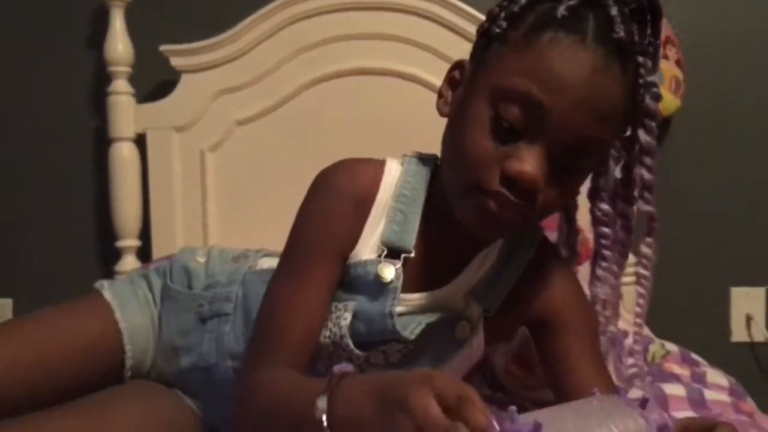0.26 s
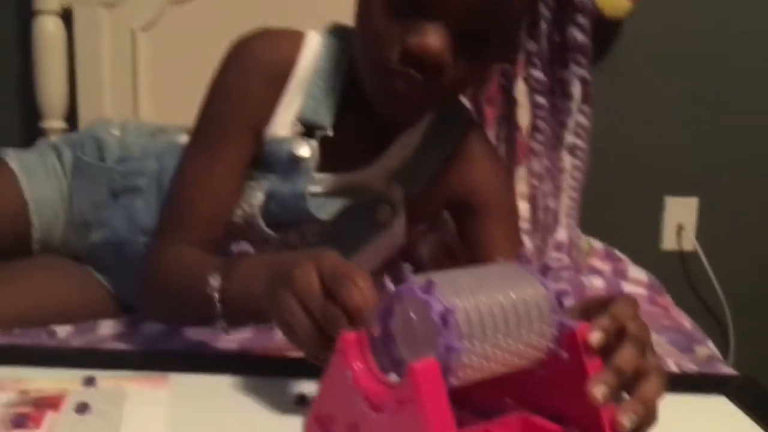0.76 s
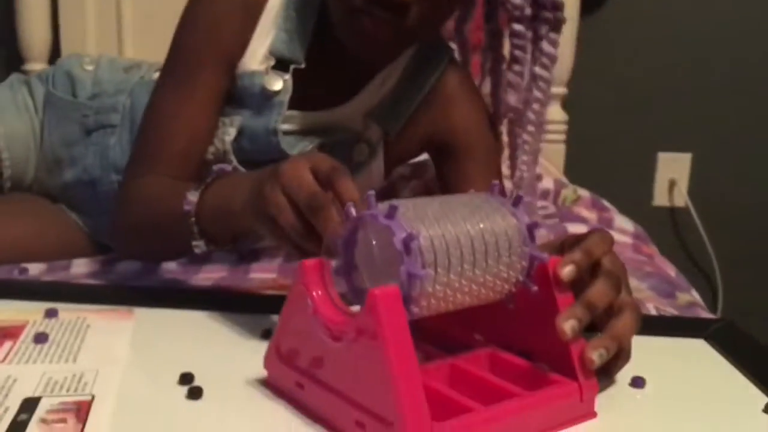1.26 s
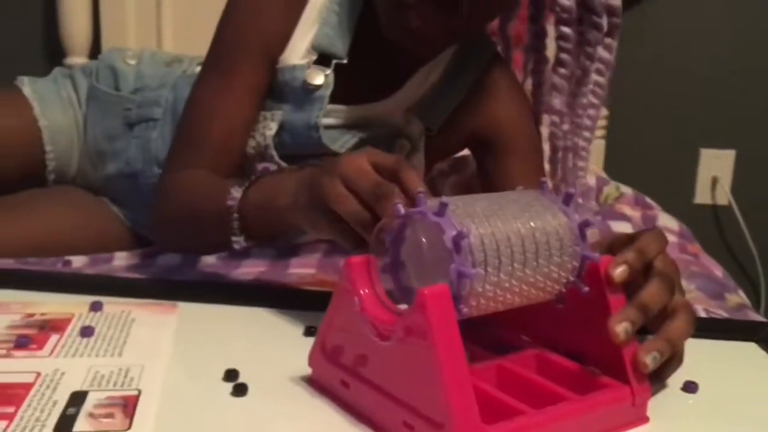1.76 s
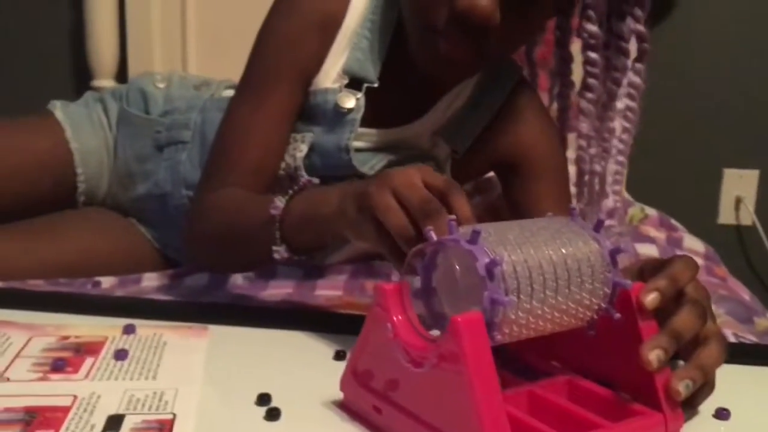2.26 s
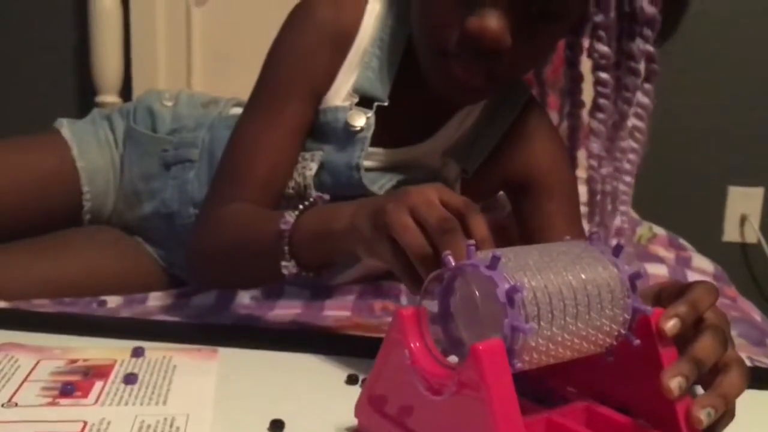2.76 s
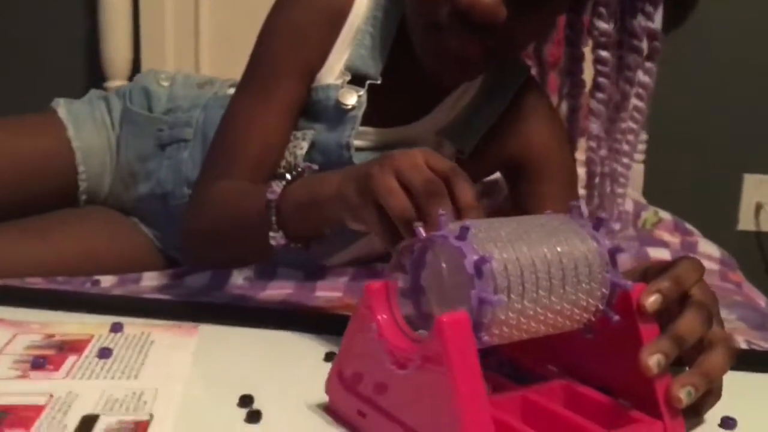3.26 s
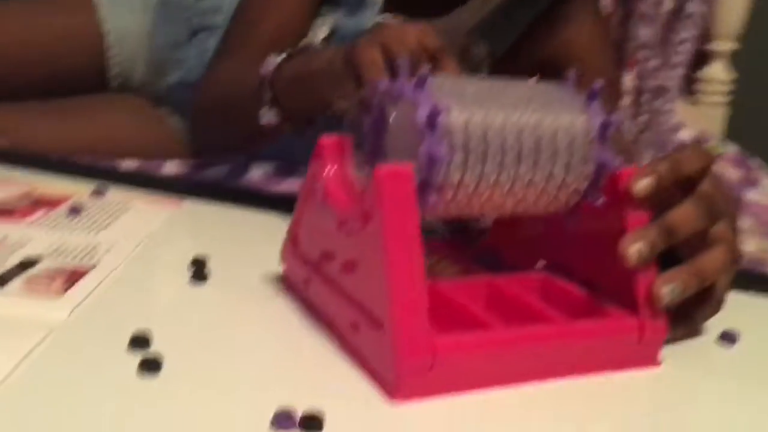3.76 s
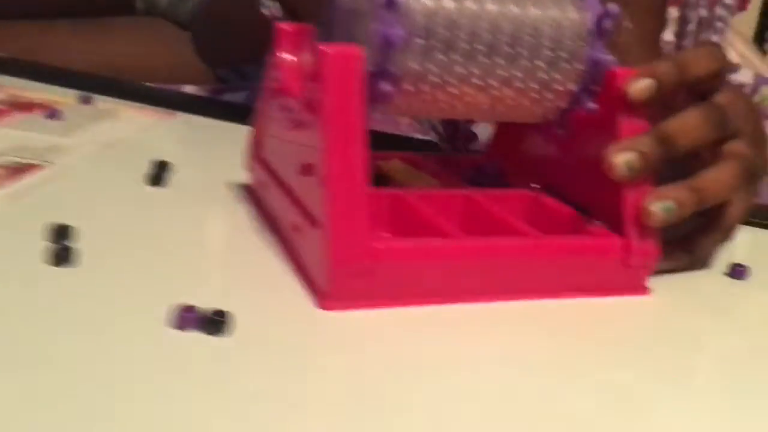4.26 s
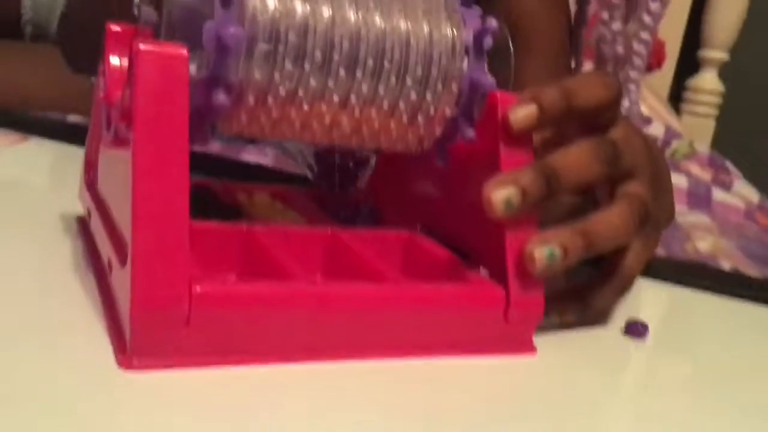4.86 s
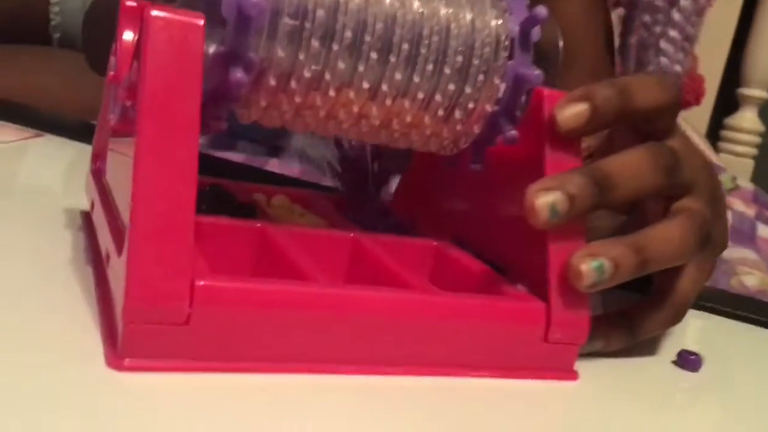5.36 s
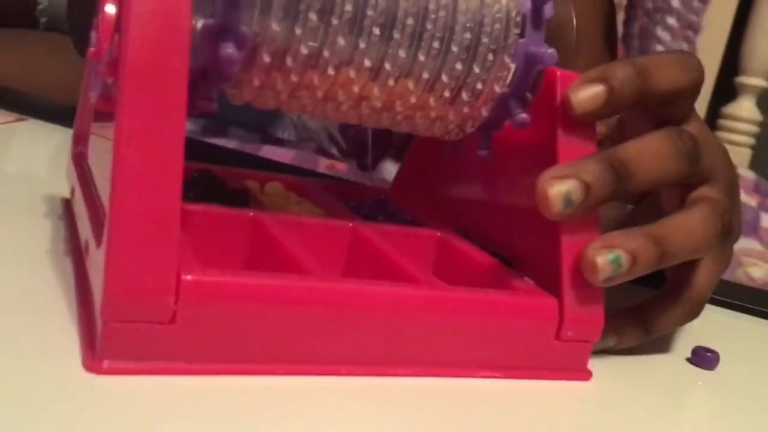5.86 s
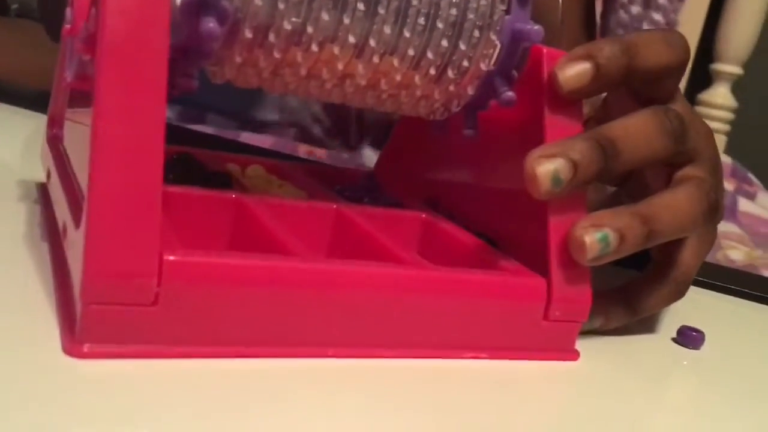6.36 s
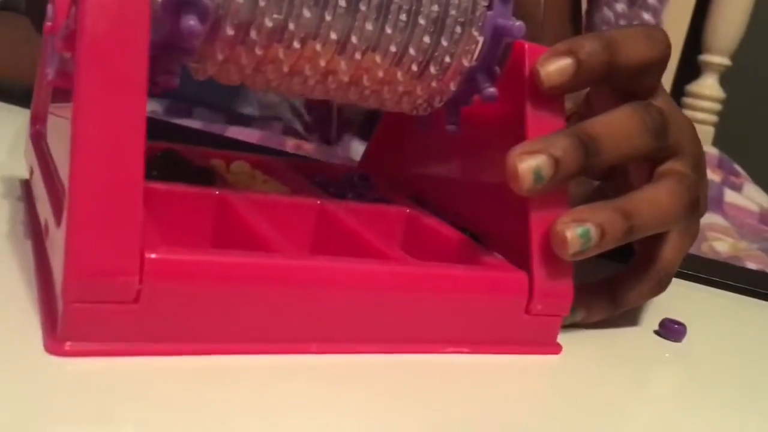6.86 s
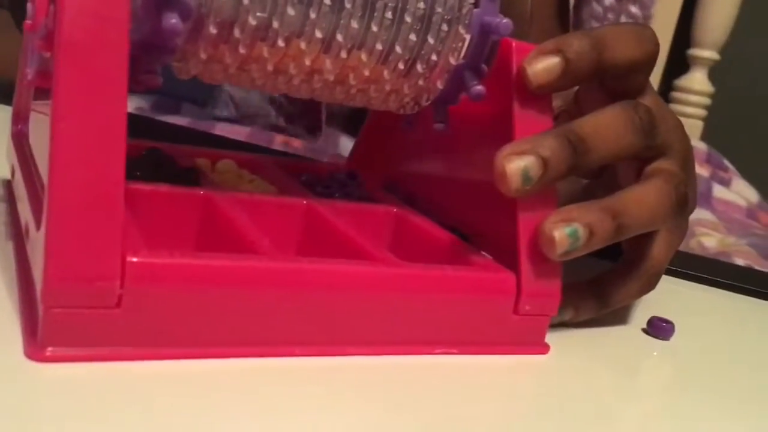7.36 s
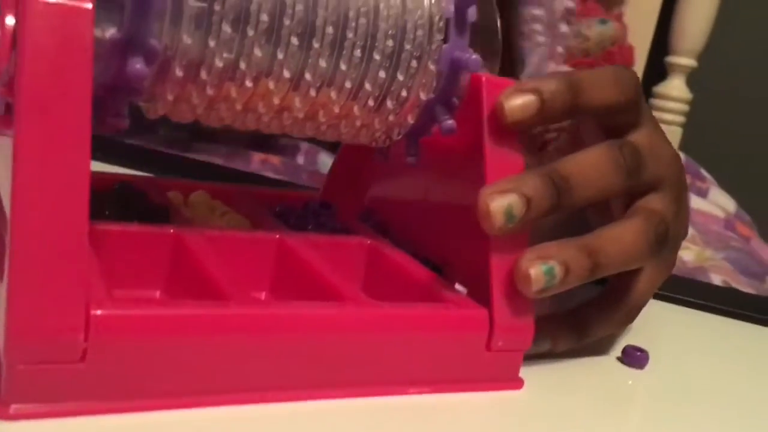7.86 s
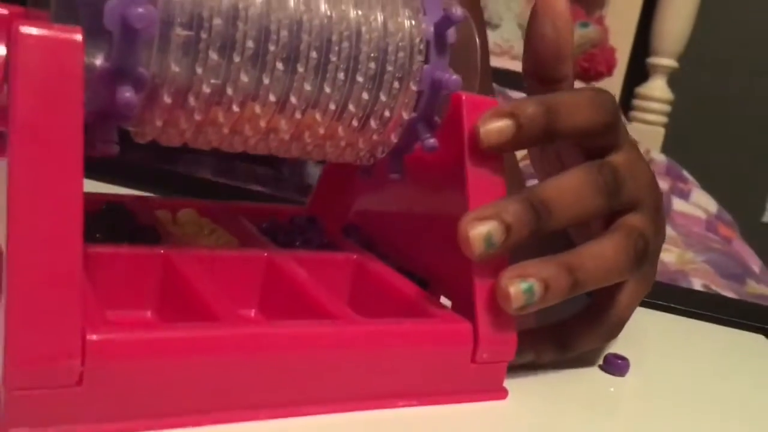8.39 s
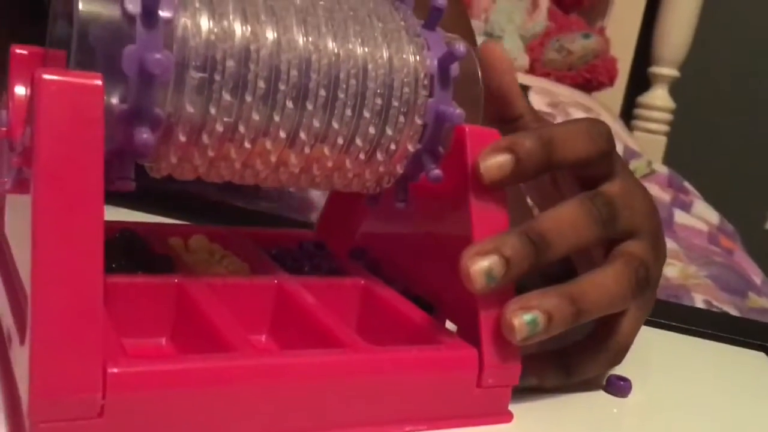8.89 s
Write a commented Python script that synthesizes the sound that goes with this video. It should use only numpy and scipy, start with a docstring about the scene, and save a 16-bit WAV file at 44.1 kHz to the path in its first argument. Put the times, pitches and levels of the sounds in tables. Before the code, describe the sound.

Close to a toy plastic drum in a small quiet bedroom, beads rattle in a crisp early burst, nearly stop, then tumble in irregular clicks and short clusters for several seconds. Dull knocks of the plastic stand and soft bass thumps come between, with a faint breathy axle squeak. Near the end only sparse ticks, small scrapes on the table and low handling thumps remain.

```python
"""Bedroom table, microphone close to the ribbed plastic drum of a toy bead machine; still air and faint hum.
A grip scuffs and hands rumble low (shaped noise); a child turns the drum, beads rattle and click on its wall
(short noise bursts in shell colours), the stand scrapes in tiny slips, and the small room answers.
From 1.4 s come dull knocks of the stand and soft bass thumps, at 3.2 s two breathy squeaks of the axle
(gliding resonance). From 7.3 s the clicks are sparse; the stand scrapes again and the last thumps follow."""
import sys
import numpy as np
from scipy import signal
from scipy.fft import rfft, irfft
from scipy.io import wavfile
from scipy.ndimage import uniform_filter1d

SR = 44100
rng = np.random.default_rng(int(sys.argv[2]) if len(sys.argv) > 2 else 0)


def master_out(mix):
    """Clip the mix to full scale and print it as 16-bit PCM to the path in sys.argv[1]."""
    frames = np.transpose(np.atleast_2d(mix))
    ceiling = np.clip(frames, -1, 1)
    pcm = np.round(ceiling * 32767).astype(np.int16)
    wavfile.write(sys.argv[1], SR, pcm)


N = 402633  # samples, about 9.1 s

# Still air of the room. Each row: frequency in Hz, relative density in dB per Hz.
AIR_COLOUR = [(18, -41.5), (30, -17), (70, -3.5), (98, -5), (157, -10.5), (415, -16), (2010, -22.5),
              (2750, -25), (8740, -27.5), (16000, -36.5)]
AIR_DB = -71.5
HUM_HZ, HUM_DB = 160, -78.5
# Low rumble of the moving hands. Each row: time in seconds, level in dB before its lumps.
RUMBLE_LEVEL = [(0, -82.5), (2.8, -70.5), (4.2, -65.5), (6.7, -63.5), (7.7, -67.5), (8.58, -69),
                (8.64, -65.5), (8.9, -61), (9.06, -70)]
# Colour of that rumble. Each row: frequency in Hz, relative density in dB per Hz.
RUMBLE_COLOUR = [(20, -23), (42, -5), (95, -0.5), (160, -4), (260, -6), (500, -24.5), (2000, -51.5),
                 (16000, -80.5)]
# Fingers shift their grip with a dull scuff. Each row: start in seconds, length in seconds, strength in dB.
GRIP_SCUFFS = [(0, 0.2, -61.5), (.86, 0.28, -64.5), (1.53, 0.29, -59.5), (3.9, .08, -61.5),
               (4.38, .36, -59), (5.7, 0.074, -55), (6.34, .05, -57.5), (7.66, 0.37, -62.5)]
# Colour of the scuffs. Each row: frequency in Hz, relative density in dB per Hz.
SCUFF_COLOUR = [(100, -5), (500, -7.5), (1100, 3.5), (1700, -1.5), (3000, -9), (6000, -11), (16000, -24.5)]
# Broad resonances of the thin drum wall; each struck spot favours others.
# Each row: centre in Hz, half width in Hz, usual lift in dB.
WALL_RESONANCES = [(1160, 63, 3.5), (1890, 88, 0), (2693, 93, 4.5), (3510, 330, 2), (4500, 210, 2.5),
                   (5324, 240, 2), (6304, 220, 3), (7030, 170, 2), (8740, 580, 0), (11430, 220, 2),
                   (14300, 530, 5.5)]
# Echo of the small bedroom. Each row: frequency in Hz, time to fall 60 dB in seconds.
ROOM_DECAY = [(200, 0.5), (1200, 0.37), (4500, 0.26), (9000, 0.14), (16000, 0.3)]
# Colour of that echo. Each row: frequency in Hz, relative level in dB.
ECHO_COLOUR = [(200, 0.5), (700, 3), (1150, -5), (2500, 1), (4500, 1.5), (9000, -0.5), (16000, -3.5)]
# The beads creep while the drum is turned. Each row: start in seconds, length in seconds, strength in dB.
TURNING_SPELLS = [(0.12, .72, -56), (1.76, 5.45, -56)]
# Each push on the drum sends part of the heap tumbling.
# Each row: start in seconds, length in seconds, strength in dB.
HEAP_TUMBLES = [(0.24, .11, -49.5), (0.35, .06, -37), (0.441, 0.02, -36), (0.52, 0.19, -37),
                (0.79, 0.017, -49), (1.51, 0.31, -59.5), (1.868, 0.013, -37), (1.93, 0.091, -49.5),
                (2.31, 0.13, -41), (2.69, 0.42, -45.5), (2.86, 0.25, -46.5), (3.01, 0.03, -35.5),
                (3.08, 0.066, -56), (3.39, 0.055, -50), (3.64, 0.11, -54), (3.99, 0.026, -53.5),
                (4.085, 0.092, -51), (4.255, 0.012, -45), (4.38, 0.1, -48.5), (4.69, 0.054, -50.5),
                (4.84, 0.041, -47.5), (5.04, 0.34, -55.5), (5.22, 0.12, -43), (5.31, 0.088, -39),
                (5.47, 0.017, -39), (5.57, 0.092, -51.5), (5.715, 0.02, -41), (6.0, 0.0089, -43.5),
                (6.09, 0.028, -48.5), (6.24, 0.037, -40.5), (6.47, 0.017, -35), (6.57, 0.057, -42),
                (6.71, 0.08, -35), (6.83, 0.019, -46.5), (7.0, 0.026, -45), (7.1, 0.086, -49),
                (7.36, 0.032, -60.5)]
TUMBLE_RISE_S, TUMBLE_SAG_DB_PER_S, TUMBLE_SETTLE_DB_PER_S = 0.004, 29.5, 167
# A click jostles the beads around it (dB against the click), which settle again.
JOSTLE_DB, JOSTLE_DB_PER_S = -21.5, 230
# Colour of the rattling heap. Each row: frequency in Hz, relative density in dB per Hz.
HEAP_COLOUR = [(60, -27), (250, -13), (700, -11), (1100, 3), (1480, 2.5), (2000, 4.5), (2900, -0.5),
               (4200, 3), (6500, 3), (9000, 2.5), (10300, -7.5), (12500, -8.5), (16000, -19)]
# Colour of one bead contact. Each row: frequency in Hz, relative density in dB per Hz.
CONTACT_COLOUR = [(60, -27.5), (300, -18), (800, -15), (1150, -3), (1480, -5), (2000, 0.5), (2900, -4.5),
                  (3700, 2), (6500, 1.5), (9000, 0.5), (10300, -4.5), (12500, -4), (16000, -19)]
# Colour of the drum bumping in its cradle. Each row: frequency in Hz, relative density in dB per Hz.
BUMP_COLOUR = [(70, -7), (200, -3.5), (600, -2), (1200, 2), (2100, -0.5), (3500, -16), (9000, -48)]
# Resonances of drum and stand. Each row: pitch in Hz, time to fall 60 dB in seconds, relative level in dB.
DRUM_MODES = [(1148, 0.059, 3), (1270, 0.043, 4), (1944, 0.016, -36.5), (2223, 0.11, -1),
              (3706, 0.021, 3.5), (4713, 0.014, 7.5), (6530, 0.047, 0), (8540, 0.014, -7)]
# Hollow ring of the drum, stronger while the microphone is close and the drum turns freely.
# Each row: time in seconds, ring gain in dB.
HOLLOW_GAIN = [(0, -23), (3.6, -18), (4.2, -14), (6.75, -16), (7.1, -29.5)]
# Clicks that stand out, bead on drum. Each row: start in seconds, strength in dB referred to 5 ms,
# hollow lows in dB, bright highs in dB (both set against the usual click).
BEAD_CLICKS = [(0.1768, -33, 7.5, 1.5), (0.2775, -37.5, 14.5, -9), (0.309, -36, 6, -6),
               (0.35, -24, -17, -7), (0.3555, -23.5, -7.5, -2.5), (0.3772, -31.5, -22.5, -2.5),
               (0.4031, -27.5, -16, -1), (0.4225, -30.5, -4.5, -13.5), (0.441, -29, -8.5, 4.5),
               (0.4481, -23.5, -15.5, 10.5), (0.4613, -24.5, -25.5, -11.5), (0.524, -32.5, -21, 0),
               (0.5482, -28, -34, -4), (0.58, -32.5, -18, 0), (0.6456, -28, -31, -4),
               (0.6784, -30.5, -12, -2), (0.709, -29.5, -24, -4), (0.7618, -35, 9, 9),
               (0.7796, -33.5, -7, -7), (1.0651, -50.5, 3, 4), (1.094, -49.5, 8.5, 0), (1.1444, -56, -4, 8),
               (1.3427, -35, -6.5, -3.5), (1.3599, -38, 13, -6), (1.508, -36, -25.5, -6.5),
               (1.6298, -37.5, 12, 0.5), (1.6924, -39.5, 3, -10.5), (1.7724, -22.5, -8.5, -0.5),
               (1.8137, -29, -27, -8), (1.8179, -28.5, 4, 2), (1.8634, -27.5, -16, -8),
               (1.8716, -27, -14, -3), (1.9433, -34.5, -18, -7), (1.9595, -31.5, -13, -6),
               (1.9903, -36, -25, -10), (2.0602, -34, -18, -8), (2.15, -38, -11, -2.5),
               (2.2054, -36, -18, -2.5), (2.285, -28, -3.5, -4), (2.3064, -30.5, -4.5, -6),
               (2.3273, -26, -16, -1.5), (2.3506, -27.5, -11, -7), (2.3677, -32.5, -23, 2.5),
               (2.396, -35.5, -26, -16), (2.4433, -36.5, -13, -9), (2.4625, -35, -18, -6),
               (2.5171, -30.5, 1.5, 1), (2.5297, -30, -15, -4), (2.7335, -31.5, -13, 4.5),
               (2.7435, -28, -5, -13.5), (2.7557, -27.5, -18.5, 1.5), (2.8152, -31.5, -6, 1),
               (2.8631, -36, 5, -4), (2.9003, -29, -11.5, -8), (2.963, -30, 0.5, -8),
               (3.031, -34, -15.5, -6), (3.0977, -31.5, -4.5, -4), (3.1611, -23.5, -6.5, -1),
               (3.2645, -41.5, -7, -8), (3.388, -35.5, -13.5, 2), (3.4238, -37, -18, -3),
               (3.6647, -40, -2.5, -2), (3.709, -40.5, -4, -5), (3.7418, -34, 1, 4.5),
               (3.7835, -32.5, -7, 0.5), (3.8022, -39, -3, -1), (4.0784, -31.5, -2, 3.5),
               (4.0842, -28.5, -6.5, 2), (4.1243, -42, 1, 0), (4.13, -29.5, -10, 3), (4.246, -29.5, 1, 5.5),
               (4.2938, -37.5, -7, 3), (4.4297, -35, -1, 0), (4.448, -39.5, 1, 1), (4.513, -43, -7, -9),
               (4.5313, -41.5, -17, -6), (4.5818, -44.5, 1, 3), (4.6423, -40, 3.5, 0.5),
               (4.7319, -30, -11, 0), (4.763, -38, -3, -1), (4.847, -39, -5, 6), (4.8876, -32.5, -12, -1),
               (4.9804, -31.5, -1.5, -3), (5.0343, -30.5, -1.5, 0.5), (5.0903, -40, -5.5, -7),
               (5.132, -43, -2, -4), (5.268, -31, -8, -2), (5.2942, -33.5, -1.5, 1.5),
               (5.3354, -29, -18, 0), (5.3743, -27.5, -23, 1.5), (5.422, -34, -5, -7),
               (5.501, -24.5, -2, -3.5), (5.5081, -24, -17, 8.5), (5.5264, -26.5, -15, -2.5),
               (5.5674, -31, 0, 2), (5.583, -34.5, -7, -2), (5.7144, -34, -10, -4.5),
               (5.7448, -38.5, 6, -17), (5.8696, -40.5, 12.5, -3), (5.8907, -39.5, -0.5, 3),
               (5.985, -38.5, -7, -6), (5.9984, -27.5, -3, 1), (6.0031, -24, -1.5, 1.5),
               (6.0773, -33.5, -13.5, -11.5), (6.0912, -31, 0, -3.5), (6.1242, -36, -2, -13),
               (6.1425, -31, -2, -4), (6.168, -42, -8.5, 4), (6.19, -23, -8.5, -6.5),
               (6.2272, -25.5, -12.5, 3), (6.2583, -36, -8, 2), (6.2662, -28, -6.5, -2),
               (6.2998, -23.5, -10, 7.5), (6.356, -33, 7.5, 8.5), (6.4385, -29, 3, -2),
               (6.481, -35, 17, 12), (6.563, -27.5, -11, -3), (6.5796, -23.5, -3, 8),
               (6.6122, -30.5, -5, 4), (6.6768, -29, -3, 1), (6.693, -26, -3.5, 2.5),
               (6.7131, -26.5, -1, -3), (6.733, -29, -32, 12), (6.7698, -30.5, -29, 3), (6.838, -33, -5, 3),
               (6.918, -23, -6, -5), (6.9525, -30.5, -8, -1), (6.9741, -29, -8, -2),
               (7.0666, -32.5, -15, -2.5), (7.0958, -36, -11, -4), (7.1039, -38, -17, -3),
               (7.113, -33.5, -17, 3), (7.127, -37.5, -15, 2), (7.2979, -44, -1, -11),
               (7.3604, -45.5, 2, 0), (7.3716, -46.5, -2, -2), (7.419, -42, 13, 0), (7.444, -47, 12, 6),
               (7.604, -48.5, 21, -12), (7.7176, -44.5, 9, -6), (7.814, -43.5, 2, -9), (7.912, -42, 4, -7),
               (7.955, -39, 12, -3), (8.0747, -48.5, 9, -31), (8.224, -42, -5, -4)]
# The stand is pushed over the table, catches and slides on.
# Each row: start in seconds, length in seconds, strength in dB.
STAND_SLIDES = [(0.19, 0.15, -52), (0.27, 0.17, -47), (0.5, 0.12, -55), (7.915, 0.028, -41.5),
                (8.0, 0.072, -57), (8.17, 0.12, -56), (8.297, 0.0083, -38), (8.39, 0.049, -45.5)]
SLIDE_RISE_S, SLIDE_SAG_DB_PER_S, SLIDE_STOP_DB_PER_S = 0.0056, 12.5, 173
# Colour of the scrape. Each row: frequency in Hz, relative density in dB per Hz.
SCRAPE_COLOUR = [(60, -2), (300, -5), (700, 1), (1700, 2), (2700, 3.5), (4500, 0), (8000, -3.5),
                 (10300, -6.5), (13500, -9.5), (16000, -15.5)]
# Soft thumps of handling. Each row: start in seconds, strength in dB.
HAND_THUMPS = [(1.356, -54), (1.629, -56), (3.054, -49), (3.334, -57.5), (4.019, -51.5), (4.396, -46),
               (5.315, -47), (5.494, -53), (5.743, -45.5), (5.877, -50), (5.998, -54), (6.255, -55),
               (6.474, -43.5), (6.699, -54), (6.76, -51), (7.012, -48.5), (7.23, -44), (7.422, -47),
               (7.932, -49), (8.30, -56), (8.625, -58), (8.816, -48.5), (8.856, -44.5), (8.904, -43)]
# Dull knocks of the stand. Each row: start in seconds, strength in dB, pitch in Hz.
STAND_KNOCKS = [(1.36, -38, 596), (1.363, -38.5, 215), (1.634, -37, 726), (1.626, -39, 182),
                (2.306, -37, 665), (3.047, -48, 483), (3.333, -41.5, 229), (3.866, -32, 570),
                (3.868, -40.5, 285), (6.868, -41.5, 395), (7.224, -36.5, 240), (7.419, -40, 388),
                (7.447, -43, 513), (7.954, -42, 650)]
# The axle rubs in its cradle with a breathy squeak.
# Each row: start in seconds, length in seconds, level in dB, first pitch in Hz, last pitch in Hz.
AXLE_RUBS = [(3.215, 0.37, -58.5, 2920, 3426), (3.499, 0.22, -61.5, 3410, 3050)]
EDGE_HZ = 16500  # upper limit of the recorder


def amp(db):
    """Decibels to gain."""
    return 10 ** (np.asarray(db) / 20)


def unit(x):
    """Scales to an energy of one."""
    return x / np.sqrt(np.sum(x ** 2) + 1e-20)


def read(points, hz):
    """Reads a table along a log-frequency axis."""
    f, value = np.transpose(points)
    return np.interp(np.log(hz + 1), np.log(f), value)


def add(mix, s, sound):
    """Mixes a sound in at time s."""
    part = mix[max(round(s * SR), 0):][:len(sound)]
    part += sound[:len(part)]


def follow(curve):
    """A curve of dB as a gain at every sample."""
    return amp(np.interp(np.arange(N) / SR, *np.transpose(curve)))


def dying(t, t60):
    """Decay by 60 dB in t60 seconds."""
    return np.exp(-np.log(1000) * t / t60)


def noise(colour):
    """Steady noise of rms one with the given spectrum."""
    spectrum = rfft(rng.standard_normal(N))
    gain = amp(read(colour, np.fft.rfftfreq(N, 1 / SR)))
    return unit(irfft(spectrum * gain, N)) * np.sqrt(N)


def background():
    """Still air as shaped steady noise, with a faint hum as a single sine."""
    hum = np.sqrt(2) * np.sin(2 * np.pi * HUM_HZ * np.arange(N) / SR)
    return amp(AIR_DB) * noise(AIR_COLOUR) + amp(HUM_DB) * hum


def rumble(lump_db=3.0, lumps_per_s=22):
    """Moving hands make a low rumble: bass-heavy noise with a lumpy, random level."""
    lumps = np.interp(np.arange(N) / SR * lumps_per_s, np.arange(SR), rng.standard_normal(SR))
    return follow(RUMBLE_LEVEL) * amp(lump_db * lumps) * noise(RUMBLE_COLOUR)


def causal(db_at, size=1024):
    """The sharpest impulse response that has the given dB spectrum (minimum phase)."""
    log_gain = np.log(amp(db_at(abs(np.fft.fftfreq(size, 1 / SR)))))
    return np.fft.ifft(np.exp(signal.hilbert(log_gain).conj())).real


def contact(colour, low_db, high_db, t60, rise_s, wall=1, spot_db=4, treble_hz=7500, treble_life=0.87,
            size=1024):
    """One blow on thin plastic: crowded shell modes rise and die in milliseconds, coloured by the spot struck."""
    t, hz = np.arange(size) / SR, np.fft.rfftfreq(size, 1 / SR)
    modes = rng.standard_normal(size)
    treble = irfft(rfft(modes) * (hz > treble_hz), size)
    # the bead chatters for a moment before the shell is left to die away
    free = np.maximum(t - rng.uniform(.0003, .0022), 0)
    # plastic damps its high modes sooner
    shell = (modes - treble) * dying(free, t60) + treble * dying(free, t60 * treble_life)
    shell = shell * (1 - np.exp(-(t / rise_s) ** 2))
    # the modes share the energy evenly over wide bands
    broad_db = 10 * np.log10(uniform_filter1d(abs(rfft(shell)) ** 2, size=31) + 1e-9)
    tilt = [(1700, low_db), (3000, 0), (6500, 0), (9000, high_db)]  # Hz, dB
    spot = np.zeros(len(hz))
    for centre, width, lift_db in WALL_RESONANCES:
        peak_db = wall * lift_db + spot_db * rng.standard_normal()
        spot += peak_db / (1 + ((hz - centre) / width) ** 2)
    shape = causal(lambda f: read(colour, f) + read(tilt, f) + np.interp(f, hz, spot - broad_db))
    return unit(signal.fftconvolve(shell, shape)[:size])


def grains(level, colour, per_s, spread_db, vary_db, t60, wall=1, count=36):
    """A swarm of small random contacts on many different spots, mostly faint, following a level."""
    happens = rng.random(N) < per_s / SR
    size = amp(spread_db * np.minimum(rng.exponential(1, N), 3)) * happens
    # the hand feeds in energy steadily: contacts close in time share it
    size = size / np.sqrt(uniform_filter1d(size ** 2, size=1500) + np.mean(size ** 2) / 10)
    blows, spot, out = size * level, rng.integers(0, count, N), np.zeros(N)
    for k in range(count):
        low_db, high_db = vary_db * rng.standard_normal(2)
        blow = contact(colour, low_db, high_db, t60, rise_s=0.00026, wall=wall)
        out += signal.oaconvolve(blows * (spot == k), blow)[:N]
    return out


def pushes(rows, rise_s, sag_db_per_s, stop_db_per_s):
    """Gain of a series of movements: each starts quickly, sags while it lasts and then dies away."""
    t, power = np.arange(2 * N) / SR, np.zeros(N)
    for s, length, db in rows:
        age = t[:int((length + .6) * SR)]
        fall_db = sag_db_per_s * np.minimum(age, length) + stop_db_per_s * np.maximum(age - length, 0)
        add(power, s, (np.minimum(age / rise_s, 1) * amp(db - fall_db)) ** 2)
    return np.sqrt(power)


def scuffs():
    """Fingertips slip over the plastic in soft, dull grains."""
    level = pushes(GRIP_SCUFFS, rise_s=.01, sag_db_per_s=13.5, stop_db_per_s=143.5)
    return grains(level, SCUFF_COLOUR, per_s=250, spread_db=5, vary_db=-0.5, t60=.02, wall=0, count=12)


def tail(first_s=0.0051):
    """Sparse reflections from near walls, each band dying at its own speed."""
    size = SR * 3 // 5
    present = (rng.random(size) < 4000 / SR) * (np.arange(size) > first_s * SR)
    taps = rng.standard_normal(size) * present
    hz, t, bands = signal.stft(taps, SR, nperseg=256)
    bands = bands * dying(t, read(ROOM_DECAY, hz)[:, None]) * amp(read(ECHO_COLOUR, hz))[:, None]
    return unit(signal.istft(bands, SR, nperseg=256)[1])


def room(x, wet_db=-11, shift_per_s=3.1, count=4):
    """The turning drum radiates in changing directions, so the pattern of reflections keeps shifting."""
    angle = np.pi * shift_per_s * np.arange(N) / SR
    echo = np.zeros(N)
    for k in range(count):
        path = np.sqrt(2 / count) * np.cos((1 + k // 2) * angle + k * np.pi / 2)
        echo += signal.oaconvolve(x * path, tail())[:N]
    return x + amp(wet_db) * echo


def stirring():
    """How strongly the heap moves: creep while turning, tumbles, and the jostle after each click."""
    creep = pushes(TURNING_SPELLS, rise_s=0.033, sag_db_per_s=3.5, stop_db_per_s=112)
    tumble = pushes(HEAP_TUMBLES, TUMBLE_RISE_S, TUMBLE_SAG_DB_PER_S, TUMBLE_SETTLE_DB_PER_S)
    jostles = [(s, 0, db + JOSTLE_DB) for s, db, _, _ in BEAD_CLICKS]
    jostle = pushes(jostles, rise_s=.004, sag_db_per_s=0, stop_db_per_s=JOSTLE_DB_PER_S)
    return np.sqrt(creep ** 2 + tumble ** 2 + jostle ** 2)


def moving(stir, rest_db=-66):
    """Near one while the heap moves well, falling to zero at rest."""
    return stir ** 2 / (stir ** 2 + amp(rest_db) ** 2)


def heap(stir, level_db=-2):
    """Beads tumble over each other as the drum turns; few touch the wall, so its resonances are weaker."""
    level = amp(level_db) * stir
    return grains(level, HEAP_COLOUR, per_s=260, spread_db=2.5, vary_db=3.5, t60=0.018, wall=.55)


def strays(stir, level_db=-48, growth=0.98, usual_db=-48):
    """Single beads hop off the moving heap and tick lightly on the wall."""
    level = amp(level_db) * (stir / amp(usual_db)) ** growth * moving(stir)
    return grains(level, CONTACT_COLOUR, per_s=36, spread_db=3, vary_db=4, t60=.012)


def bumps(stir, level_db=-46, growth=0.21):
    """The loose drum bumps dully in its cradle, harder when the beads are stirred more, and not at rest."""
    level = amp(level_db) * stir ** growth * moving(stir)
    return grains(level, BUMP_COLOUR, per_s=60, spread_db=8, vary_db=4.5, t60=0.043, wall=0)


def drum(x):
    """Every bead contact also sets the whole drum ringing in its decaying modes."""
    t = np.arange(SR // 8) / SR
    ring = np.zeros(len(t))
    for hz, t60, db in DRUM_MODES:
        ring += amp(db) * unit(np.sin(2 * np.pi * hz * t) * dying(t, t60))
    return x + follow(HOLLOW_GAIN) * signal.oaconvolve(x, unit(ring))[:N]


def clicks(level_db=0, usual_low_db=-7, usual_high_db=-1.5, t60=.013):
    """Single beads drop on the drum wall, each click with the colour of the place that is hit."""
    out = np.zeros(N)
    attack_samples = .005 * SR
    for s, db, low_db, high_db in BEAD_CLICKS:
        blow = contact(CONTACT_COLOUR, low_db - usual_low_db, high_db - usual_high_db, t60, rise_s=.0005)
        add(out, s, amp(db + level_db) * np.sqrt(attack_samples) * blow)
    return out


def scrape(level_db=0):
    """The stand slides over the table in tiny, crowded slips."""
    level = amp(level_db) * pushes(STAND_SLIDES, SLIDE_RISE_S, SLIDE_SAG_DB_PER_S, SLIDE_STOP_DB_PER_S)
    return grains(level, SCRAPE_COLOUR, per_s=1100, spread_db=4.5, vary_db=4.5, t60=0.0093, wall=0)


def thumps(thump_hz=88, swell_s=0.0093):
    """Soft pushes of the hands swell and fade in the bass, each slightly detuned."""
    out, t = np.zeros(N), np.arange(SR // 5) / SR
    swell = t / swell_s * np.exp(1 - t / swell_s)
    for s, db in HAND_THUMPS:
        hz = thump_hz * rng.uniform(0.93, 1.2)
        add(out, s, amp(db) * swell * np.sin(2 * np.pi * hz * t))
    return out


def knocks(t60=0.03, snap_db=-7, overtone=2.8, snap_t60=0.012, note_db=-3, clatter_db=12, clatter_t60=0.031):
    """The stand rocks on the table: a damped low note, a brief higher snap and a loose, dull clatter."""
    out, t = np.zeros(N), np.arange(SR // 10) / SR
    for s, db, hz in STAND_KNOCKS:
        angle = 2 * np.pi * hz * t
        note = np.sin(angle) * dying(t, t60)
        snap = amp(snap_db) * np.sin(overtone * angle) * dying(t, snap_t60)
        add(out, s, amp(db + note_db) * (note + snap))
        body = [(hz / 4, -10), (hz, 0), (2 * hz, -5), (8 * hz, -32)]  # Hz, dB
        clatter = contact(body, 0, 0, clatter_t60, rise_s=0.0015, wall=0, size=2048)
        add(out, s, amp(db + clatter_db) * clatter)
    return out


def axle(width_hz=460, stutter_db=3):
    """Uneven friction excites one gliding resonance that swells and fades with each rub."""
    out, r = np.zeros(N), np.exp(-np.pi * width_hz / SR)
    for s, length, db, first_hz, last_hz in AXLE_RUBS:
        u = np.linspace(0, 1, int(length * SR))  # progress of the rub
        grip = amp(stutter_db * np.interp(u, np.linspace(0, 1, 30), rng.standard_normal(size=30)))
        # complex noise, narrowed around zero and then shifted up to the gliding pitch
        friction = rng.standard_normal((len(u), 2)) @ [1, 1j]
        band = signal.lfilter([1], [1, -2 * r, r * r], friction)
        glide_hz = first_hz + (last_hz - first_hz) * u
        squeak = (band * np.exp(2j * np.pi * np.cumsum(glide_hz) / SR)).real
        swell = np.sqrt(u * (1 - u))
        add(out, s, amp(db) * np.sqrt(len(u)) * unit(squeak * grip * swell))
    return out


def scene():
    """The toy in its room, with close knocks, handling and still air added without echo."""
    stir = stirring()
    beads = drum(clicks() + heap(stir) + strays(stir))
    toy = beads + scrape() + scuffs() + bumps(stir) + axle()
    return (room(toy) + knocks() + thumps() + rumble() + background())[None]


def record(dry):
    """The band limit of the recorder: a steep low-pass."""
    low_pass = signal.firwin(255, EDGE_HZ, window=("kaiser", 9), fs=SR)
    return signal.oaconvolve(dry, low_pass[None], "same")


dry = scene()
out = record(dry)
master_out(out)
```